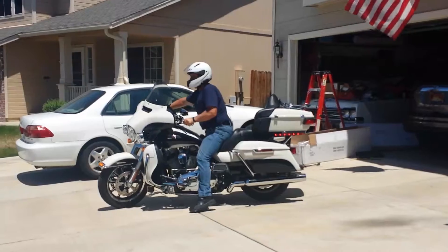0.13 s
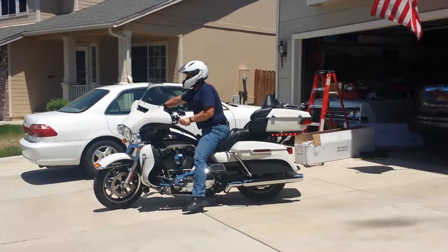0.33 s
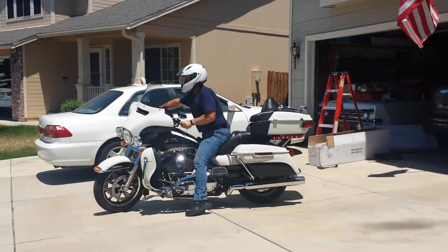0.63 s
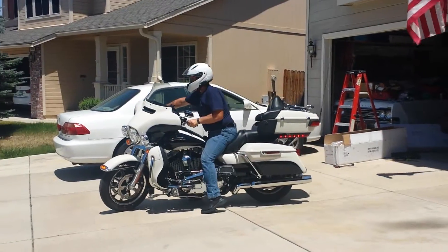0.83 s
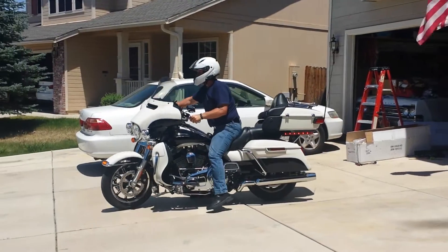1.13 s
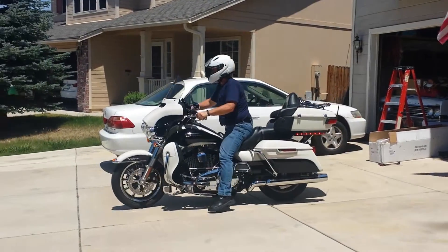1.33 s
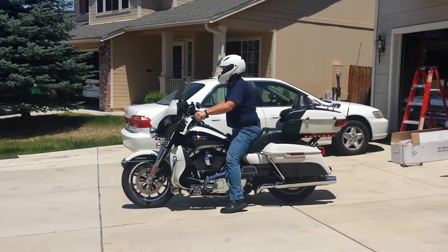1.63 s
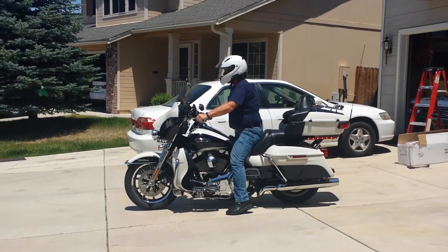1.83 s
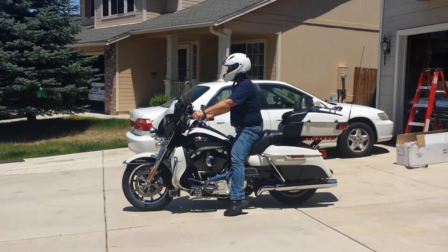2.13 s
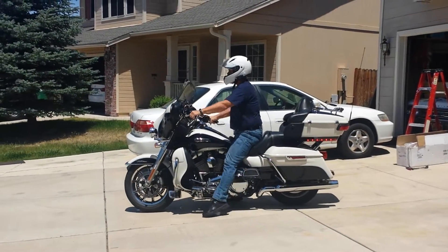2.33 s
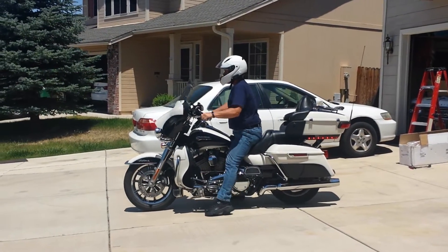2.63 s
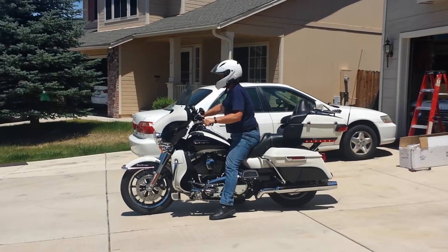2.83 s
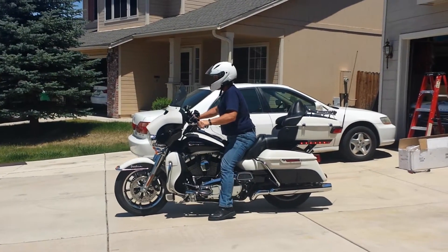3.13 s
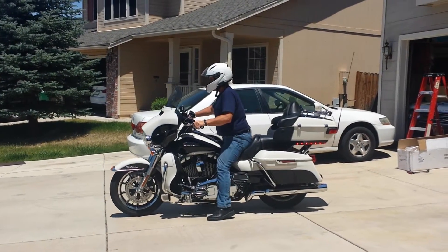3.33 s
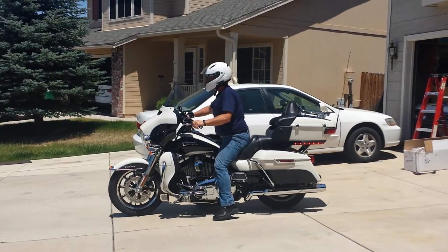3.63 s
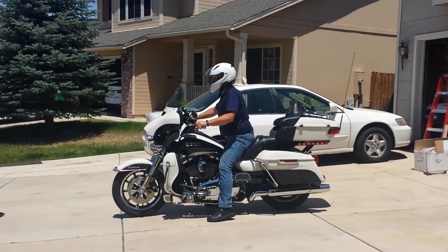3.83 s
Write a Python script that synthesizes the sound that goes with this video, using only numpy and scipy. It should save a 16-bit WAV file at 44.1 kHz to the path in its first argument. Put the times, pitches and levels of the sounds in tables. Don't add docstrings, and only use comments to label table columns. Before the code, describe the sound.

A big two-cylinder motorcycle idles a few metres away on an open concrete driveway, fading in from silence; deep uneven exhaust thumps with ticking valve gear, then one short throttle blip near the end, captured by a small stereo microphone.

```python
import sys
import numpy as np
from scipy import signal
from scipy.fft import rfft, irfft, next_fast_len
from scipy.io import wavfile
from scipy.ndimage import map_coordinates

SR = 44100
rng = np.random.default_rng(int(sys.argv[2]) if len(sys.argv) > 2 else 0)


def unload_audio(sound):
    columns = np.transpose(np.atleast_2d(sound))
    steps = np.round(np.clip(columns, -1, 1) * 32767)
    wavfile.write(sys.argv[1], SR, steps.astype(np.int16))


def invert_db(level):
    return 10 ** (np.asarray(level, dtype=float) / 20)


N = 176400


def along(points, hz):
    f, v = np.transpose(points)
    return np.interp(np.log(hz + 1), np.log(f + 1), v)


def curve(rows, s=None):
    if s is None:
        s = np.arange(N) / SR
    return np.interp(s, *np.transpose(rows))


def wobble(rate):
    knots = rng.standard_normal(int(N * rate / SR) + 4)
    return map_coordinates(knots, [np.arange(N) * rate / SR])


def filtered(x, response):
    m = next_fast_len(N + 8192)
    return irfft(rfft(x, m) * response(np.fft.rfftfreq(m, 1 / SR)), m)[..., :N]


# pitch_hz, side_over_mid_db
STEREO_WIDTH = [(60, -20), (110, -8), (200, -24.5), (380, -8), (700, -27.5), (1290, -5), (2380, -6.5),
                (4400, 3.5), (8120, -2), (15000, 1.5)]


def wide(pair, spectrum, peaks=()):
    def level_db(hz):
        bumps = sum(gain / (1 + (2 * (hz - centre) / width) ** 2) for centre, width, gain in peaks)
        return along(spectrum, hz) + bumps

    mid, side = filtered(pair, lambda hz: invert_db([level_db(hz), level_db(hz) + along(STEREO_WIDTH, hz)]))
    return np.array([mid + side, mid - side]) / np.sqrt(np.mean(mid ** 2))


# time_s, engine_cycles
CRANK = [(.3997, -1), (.9258, 5), (1.097, 7), (1.3608, 10), (1.9931, 17), (2.5322, 23), (2.8051, 26),
         (2.9849, 28), (3.1616, 30), (3.2455, 31), (3.277, 31.428), (3.3135, 32), (3.4347, 34),
         (3.5085, 35), (3.6454, 37), (3.724, 38), (3.8089, 39), (4.073, 42)]


def moments(share):
    s, turns = np.transpose(CRANK)
    return np.interp(np.arange(turns[0], turns[-1]) + share, turns, s)


def bursts(times, sizes_db, t60):
    t = np.arange(SR // 8) / SR
    blows = np.zeros(N + SR)
    np.add.at(blows, np.round(times * SR).astype(int), invert_db(sizes_db))
    shape = invert_db(-60 * t / t60) * (1 - np.exp(-t / 0.00073))
    return np.abs(signal.fftconvolve(blows, shape)[:N])


# time_s, load_db
LOAD = [
    (3.21, 1),
    (3.24, 4),
    (3.32, 4),
    (3.39, 0),
    (3.435, 2),
    (3.48, 0.5),
    (3.72, 1),
    (3.76, -5.5),
    (3.8, 1),
]
# pitch_hz, t60_s, front_cylinder_db, rear_cylinder_db
PIPE_MODES = [(50.6, .377, -25.7, -26), (81.5, .141, -8.7, -10.1), (104.4, .135, -17, -16.3),
              (138.5, .21, -13.8, -19.3), (181, .067, -7, -9.8), (204.4, .138, -14.2, -24),
              (279, .26, -30, -18), (314.7, .076, -15.7, -25)]
INWARD_MODE = 1
REAR_AT = .428
OPEN_S, LEAD_S = .0058, .0028
JITTER_S, SCATTER_DB, MODE_SCATTER_DB = .0003, .6, .9
LOAD_SHARE, BRIGHTENS = .5, 0.087
BARK_DB, BARK_HZ, BARK_T60_S = -17, 290, .06
MUFFLER_HZ = 390


def exhaust():
    out, t = np.zeros(N + SR), np.arange(SR // 3) / SR
    hz, t60, *levels = np.transpose(PIPE_MODES)
    sign = np.where(np.arange(len(hz)) == INWARD_MODE, -1, 1)
    decay = invert_db(-60 * t / t60[:, None])
    rings = sign[:, None] * np.sin(2 * np.pi * hz[:, None] * t) * decay * (1 - np.exp(-t / OPEN_S))
    bark_wave = np.sin(2 * np.pi * BARK_HZ * (t - LEAD_S - .0013).clip(0))
    bark = -invert_db(BARK_DB - 60 * t / BARK_T60_S) * bark_wave
    load_reach = LOAD_SHARE + BRIGHTENS * np.log2(hz / hz[1]).clip(0)
    for share, level_db in zip((0, REAR_AT), levels):
        for s in moments(share):
            luck = rng.standard_normal(len(hz) + 2)
            load_db = curve(LOAD, s)
            scatter_db = SCATTER_DB * luck[0] + MODE_SCATTER_DB * luck[2:]
            gains = invert_db(level_db + load_db * load_reach + scatter_db)
            start = round((s - LEAD_S + share * JITTER_S * 2 * luck[1]) * SR)
            out[start:][:len(t)] += gains @ rings + max(load_db, 0) * bark
    return filtered(out[:N], lambda f: 1 / np.sqrt(1 + (f / MUFFLER_HZ) ** 8))


CHUFF_DB, CHUFF_REAR_DB, CHUFF_SCATTER_DB = -30, -4, 2.2
CHUFF_TILT_DB = 2.5
CHUFF_T60_S, CHUFF_LATE_S = .04, .0015


def chuff():
    tilted = [(hz, db + CHUFF_TILT_DB * np.log2(hz / 6000)) for hz, db in VALVE_SPECTRUM]
    front, rear = moments(0), moments(REAR_AT)
    s = np.r_[front, rear]
    is_rear = np.arange(len(s)) >= len(front)
    load_db = 1.9 * curve(LOAD, s).clip(-2)
    size_db = CHUFF_REAR_DB * is_rear + load_db + CHUFF_SCATTER_DB * rng.standard_normal(len(s))
    spit = wide(rng.standard_normal((2, N)), [(500, -120), (1200, -14)] + tilted, VALVE_PEAKS)
    return invert_db(CHUFF_DB) * bursts(s + CHUFF_LATE_S, size_db, CHUFF_T60_S) * spit


# pitch_hz, level_db
RUMBLE_SPECTRUM = [(30, -36), (50, -12), (80, -9.5), (160, -1.5), (250, -3), (340, -8), (420, -33),
                   (600, -34)]
RUMBLE_DB = -30


def rumble():
    swing_db = 1.6 * np.abs(curve(LOAD)) + 1.7 * wobble(30)
    gas = wide(rng.standard_normal((2, N)), [(5, -120)] + RUMBLE_SPECTRUM + [(1500, -120)])
    return invert_db(RUMBLE_DB + swing_db) * gas


# time_s, level_db
REV = [
    (3.235, -2.5),
    (3.25, 7),
    (3.34, 5.5),
    (3.42, 1),
    (3.55, 3),
    (3.7, -1.5),
    (3.8, -1.5),
]
# cycle_share, width_share, level_db
GULPS = [
    (0.26, 0.034, 2),
    (0.419, 0.066, 8.5),
    (0.81, .06, 6.5),
    (0.91, .02, 2),
]
# pitch_hz, width_hz, level_db
AIRBOX_HOLLOWS = [
    (766.3, 94, 0),
    (831.5, 91, 0),
]
AIRBOX_DB = -29
SWAY_DB, SWAY_AT = 1.5, 0.55


def airbox():
    angle = curve(CRANK) % 1
    gulp_db = sum(db * np.exp(-((angle - at) / width) ** 2 / 2) for at, width, db in GULPS)
    sway_db = SWAY_DB * np.cos(2 * np.pi * (angle - SWAY_AT))
    out = 0
    for side, (centre, width, db) in zip((1, -1), AIRBOX_HOLLOWS):
        def hollow(f):
            return (1j * f * width / (centre * centre - f * f + 1j * f * width)) ** 2

        breath_db = gulp_db + side * sway_db + 1.75 * wobble(45) - .9 * curve(REV)
        air = invert_db(breath_db) * rng.standard_normal((2, N))
        out = out + invert_db(AIRBOX_DB + db - 3.5) * wide(filtered(air, hollow), [(100, 0)])
    return out


# cycle_share, level_db, t60_s
TAPS = [
    (.04, 1, .12),
    (.21, 6.5, 0.059),
    (0.411, 2.5, 0.054),
    (.56, 6.5, 0.039),
    (0.799, 0, 0.1),
]
CLICKS_PER_S, CLICK_DB, CLICK_T60_S = 140, -7, 0.016


def taps(scatter_db, tap_db):
    out = np.ones(N)
    for share, db, t60 in TAPS:
        s = moments(share)
        out += bursts(s, db + tap_db + scatter_db * rng.standard_normal(len(s)), t60)
    luck = rng.random((round(CLICKS_PER_S * N / SR), 2))
    click_db = CLICK_DB + tap_db - 2.4 * np.log(luck[:, 1] + .002)
    return out + bursts(luck[:, 0] * N / SR, click_db, CLICK_T60_S)


# pitch_hz, level_db
CASE_SPECTRUM = [(240, -56), (400, -20), (574, -6), (811, -3.5), (1010, -16.5), (1390, -14.5), (2320, -13),
                 (3300, -20), (4290, -40), (7260, -120)]
# pitch_hz, width_hz, gain_db
CASE_PEAKS = [(1396, 175, 9), (1551, 51, 8), (2330, 260, 2.5)]
# pitch_hz, level_db
VALVE_SPECTRUM = [(1760, -1), (3000, -8), (3400, -7), (5420, -3), (7440, -2), (9090, -12), (12000, -16.5),
                  (15600, -26.5)]
# pitch_hz, width_hz, gain_db
VALVE_PEAKS = [(4910, 580, 3), (5480, 250, 5.5), (6220, 220, 3), (7400, 560, 2), (8050, 310, 3.5),
               (11400, 1100, 3)]
CASES_DB, VALVES_DB = -29.5, -30


def metal():
    drone = taps(scatter_db=2.5, tap_db=-10) * invert_db(1.24 * wobble(70)) * rng.standard_normal((2, N))
    ticks = taps(scatter_db=2.5, tap_db=-5.5) * invert_db(0.64 * wobble(60)) * rng.standard_normal((2, N))
    cases = invert_db(CASES_DB + 0.33 * curve(REV)) * wide(drone, CASE_SPECTRUM, CASE_PEAKS)
    valves = invert_db(VALVES_DB + 0.63 * curve(REV)) * wide(ticks, VALVE_SPECTRUM, VALVE_PEAKS)
    return cases + valves


def scene():
    return exhaust() + rumble() + chuff() + airbox() + metal()


def band_limit(x):
    return signal.sosfilt(signal.butter(12, 15700, fs=SR, output="sos"), x)


# pitch_hz, left_over_right_db
PORT_LEAN = [(60, 0.5), (110, 2), (200, 1.0), (380, 0.5), (700, 1), (1290, 0.5), (2380, -1), (4400, 4.5),
             (8120, -4.5), (15000, -5)]
LEFT_LAGS_S, LAG_BELOW_HZ, TOP_HZ = .00007, 1200, 15650
OPENS_S, FADE_FROM_S, FADE_TO_S = .4235, .411, .74


def record(dry):
    def dip(hz):
        return invert_db(-4 / (1 + ((hz - 3330) / 120) ** 2)) * (hz < TOP_HZ)

    def half(hz):
        lag_s = LEFT_LAGS_S / (1 + (hz / LAG_BELOW_HZ) ** 4)
        return invert_db(along(PORT_LEAN, hz) / 2) * np.exp(-1j * np.pi * hz * lag_s)

    ports = filtered(dry, lambda hz: dip(hz) * np.array([half(hz), 1 / half(hz)]))
    t = np.arange(N) / SR
    fade = np.clip((t - FADE_FROM_S) / (FADE_TO_S - FADE_FROM_S), 0, 1)
    return band_limit(ports * fade * (t > OPENS_S))


dry = scene()
out = record(dry)
unload_audio(out)
```